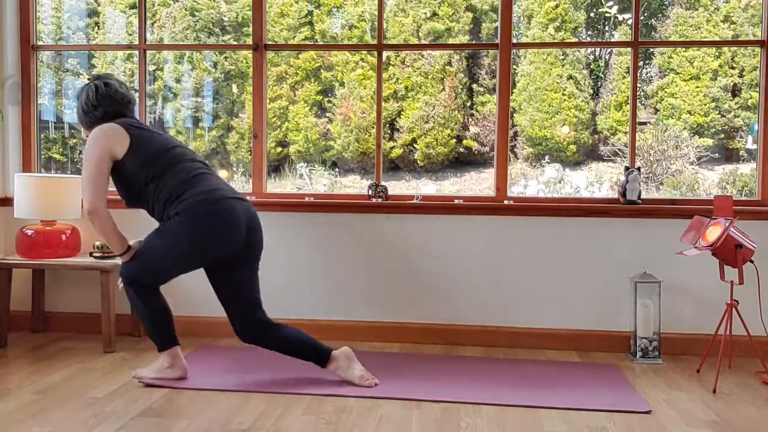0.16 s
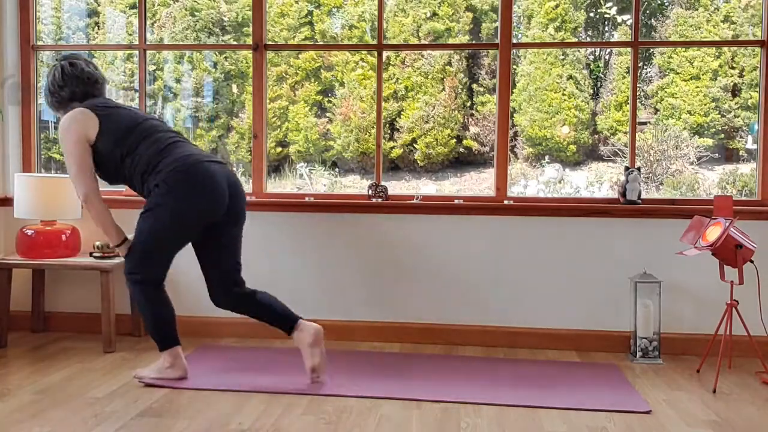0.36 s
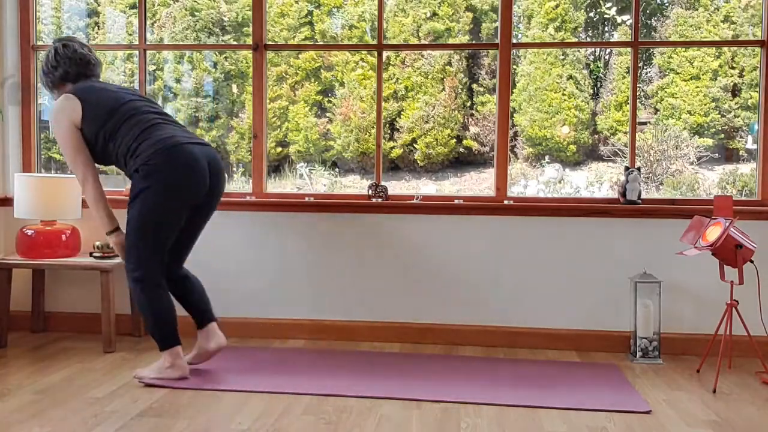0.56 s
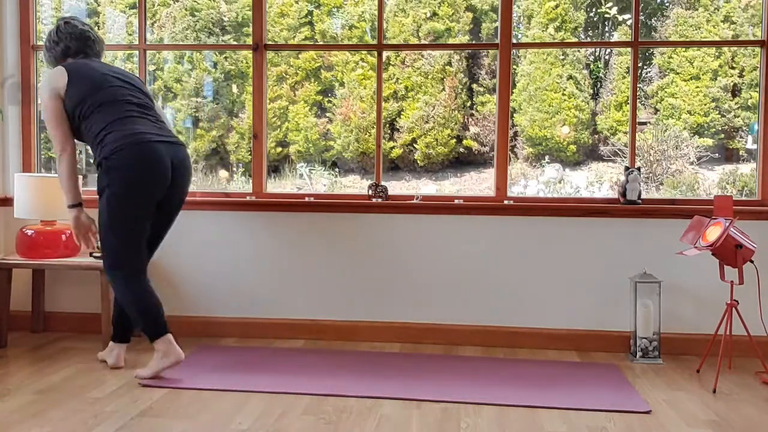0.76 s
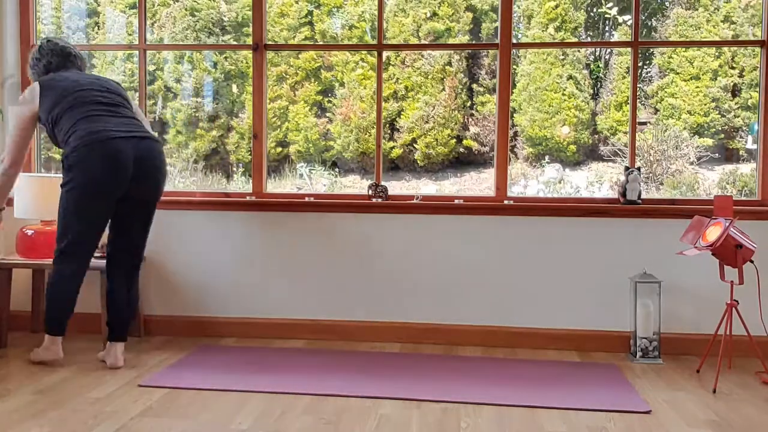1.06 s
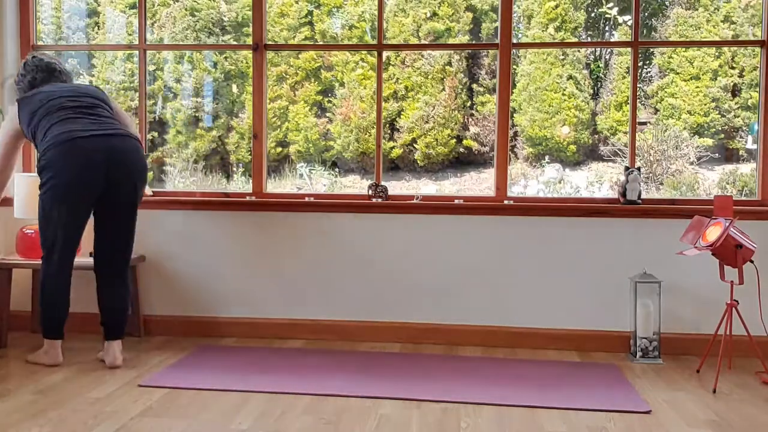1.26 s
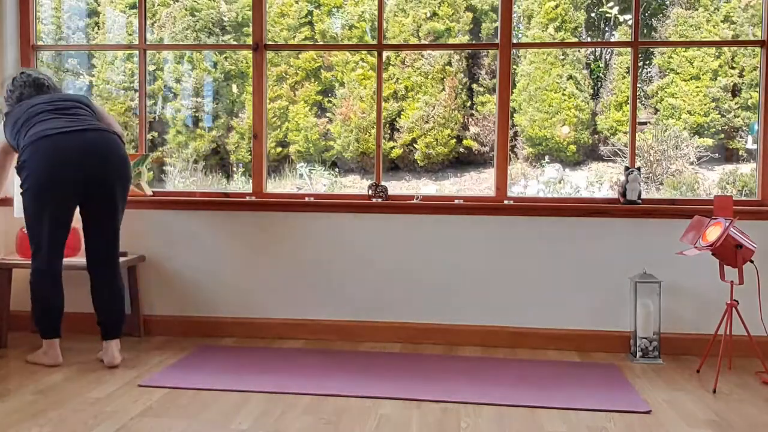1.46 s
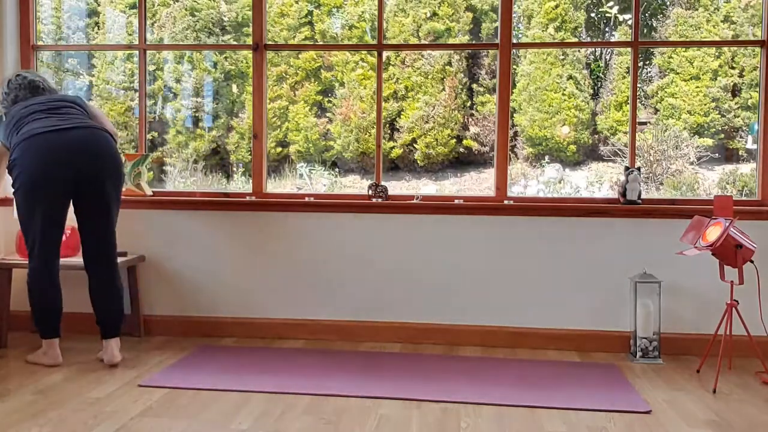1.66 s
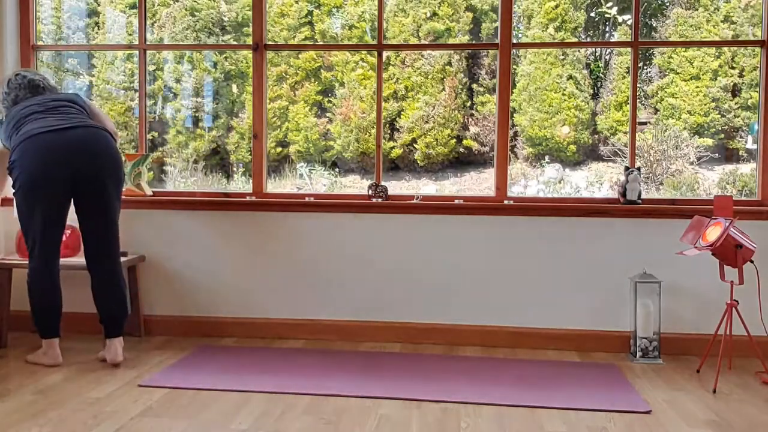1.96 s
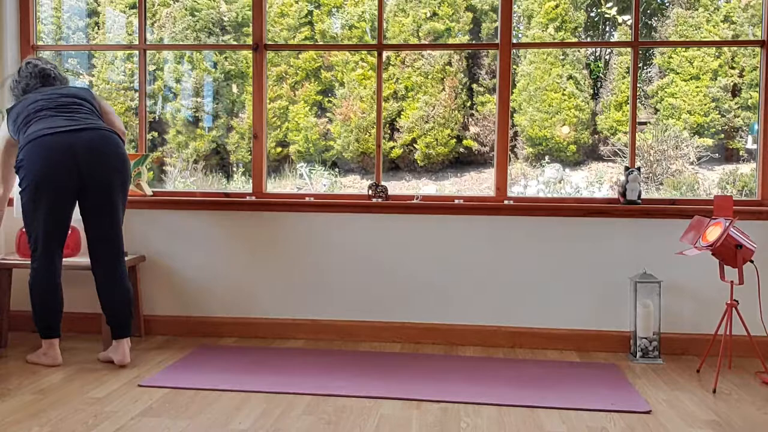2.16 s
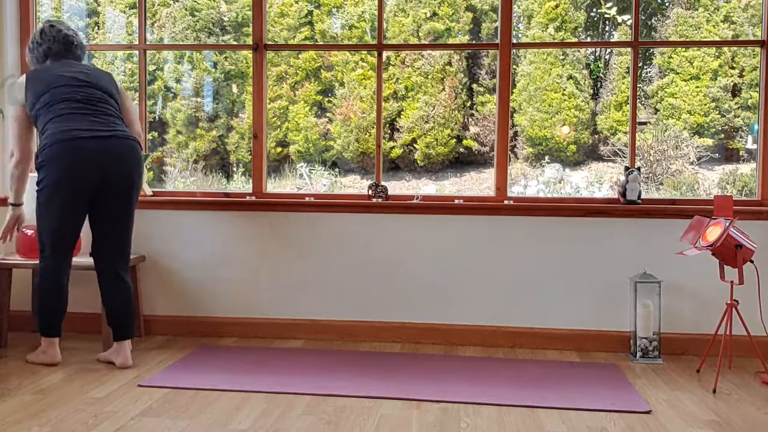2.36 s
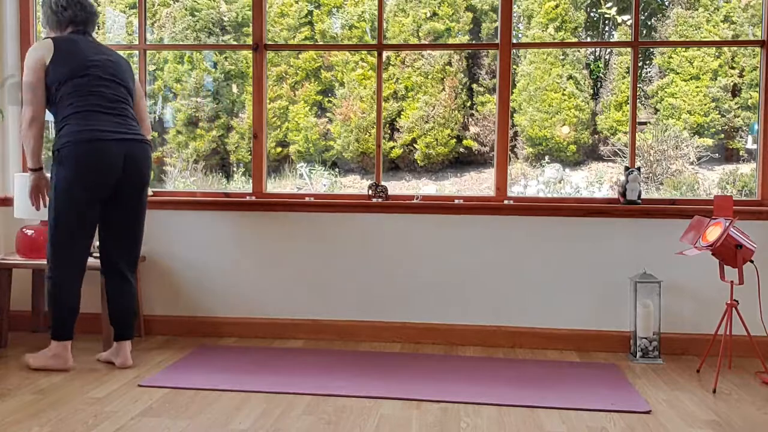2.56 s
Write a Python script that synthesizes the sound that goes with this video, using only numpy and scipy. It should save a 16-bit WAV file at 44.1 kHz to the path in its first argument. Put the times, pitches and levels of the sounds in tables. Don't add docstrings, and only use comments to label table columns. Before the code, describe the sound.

Bare feet peel off a rubber mat and scuff across a wooden floor with sharp cracks

```python
import sys
import numpy as np
from scipy import signal
from scipy.fft import rfft, irfft
from scipy.io import wavfile
from scipy.ndimage import uniform_filter1d, minimum_filter1d

SR = 44100
rng = np.random.default_rng(int(sys.argv[2]) if len(sys.argv) > 2 else 0)


def dump(signal):
    limited = np.clip(np.atleast_2d(signal).T, -1, 1)
    pcm = np.round(limited * 32767).astype(np.int16)
    wavfile.write(sys.argv[1], SR, pcm)


def voltage_ratio(level):
    return 10 ** (np.asarray(level, float) / 20)


N = 119070
t = np.arange(N) / SR

# frequency in Hz, level in dB.
HUM_COLOUR = [(18, -52), (30, -17), (81, -14.5), (147, -3), (197, 1.5), (271, 1.5), (368, -16.5),
              (500, -7.5), (650, -29.5), (1100, -120)]
HUM_DB, HUM_FADE_S, HUM_FADE_DB_PER_S = -70, 2.37, 26

# start in seconds, level in dB, frequency in Hz, T60 in seconds.
THUMPS = [(0, -63.5, 234, 1), (.1, -74.5, 520, .1), (.205, -53.5, 225, 0.7), (.33, -54, 239, 0.2),
          (0.704, -46, 570, 0.16), (0.711, -51, 198, 0.59), (.86, -60, 230, 1), (1.14, -68.5, 141, 0.83),
          (1.36, -58, 185, 0.31), (1.901, -57, 167, 0.47), (2.199, -59.5, 162, 0.5), (2.3, -73, 70, .4),
          (2.34, -77, 190, 0.22)]
THUMP_RISE_S, THUMP_WIDTH = 0.0038, 0.54

# time in seconds, level in dB.
CLOTH_LEVEL = [(0, -49.5), (.065, -48), (.14, -42.5), (.43, -46.5), (.59, -45), (.71, -39.5), (1.02, -45),
               (1.19, -46), (1.29, -52.5), (1.53, -49), (1.67, -56), (1.87, -57), (2.06, -56), (2.13, -51),
               (2.19, -55), (2.52, -49), (2.7, -63)]
# frequency in Hz, level in dB.
FABRIC_COLOUR = [(240, -46.5), (400, -15.5), (819, -15.5), (1100, -7.5), (1490, -9.5), (1640, -11.5),
                 (2800, -5.5), (4660, -10), (7300, -6.5), (9490, -27.5), (16100, -120)]
FIBRE_GRAIN_DB, PATCH_DB, SWAY_DB = 1.4, 1.2, 0.8
CLOTH_BANDS_HZ = 250 * 2 ** (np.arange(11) / 2)

# centre in seconds, level in dB, frequency in Hz,
# half-length in seconds.
SQUEAKS = [(.108, -50, 3200, .016), (.095, -55, 2660, .03), (.711, -30, 2640, .005), (.72, -45, 2640, .06),
           (.745, -47, 3340, .025), (.712, -48, 4160, .012), (1.149, -58, 3010, .02),
           (1.76, -64, 4910, .035), (1.925, -65, 4810, .03), (2.15, -64, 2960, .035),
           (2.19, -57, 2700, .012), (1.89, -66, 7160, .12), (1.49, -58, 7010, .045),
           (1.445, -64, 4910, .03)]
SQUEAK_WAVER_HZ, SQUEAK_FLUTTER_DB, SQUEAK_GAIN_DB = 42, 3, 7

# start in seconds, peak in dB,
# frequency in Hz, T60 in seconds.
RINGS = [(.2145, -39.5, 636, .16), (0.2133, -26, 1410, 0.038), (.2145, -21, 2160, 0.088),
         (.2145, -25.5, 1864, 0.085), (.233, -21, 2116, 0.045), (0.5038, -24.5, 1450, .05),
         (0.5048, -30.5, 1135, 0.068), (.5043, -38, 1950, 0.12), (0.5025, -32.5, 2770, 0.051),
         (0.5251, -29, 2710, 0.023), (0.53, -36, 1410, 0.068), (1.1486, -27, 3190, 0.013),
         (2.088, -46, 2960, .1), (2.1, -39, 2965, 0.11), (2.1, -41, 2500, 0.024),
         (.2302, -7, 3600, .04), (.2348, -7, 3250, .03), (.2315, -10, 3900, .05),
               (1.1245, -44, 3030, .05), (1.127, -40, 3700, .04), (1.1505, -35, 3010, .035),
               (1.172, -47, 3000, .04), (2.135, -51, 2960, .1), (2.165, -49, 2970, .1),
               (2.184, -50, 2660, .08), (.512, -36, 1990, .05), (.56, -42, 1330, .08),
               (.8164, -20, 1200, .005), (2.1002, -38, 2150, .012)]
RING_RISE_S, RING_FLUTTER_DB = 0.00052, 2.5

# level in dB, rise in dB per second, hold in seconds.
SCUFFS = [
    (-21.5, 2894, 0.024),
    (-22, 275, 0.072),
    (-22.5, 1442, 0.012),
    (-17.5, 333, 0.031),
    (-50, 226, 0.034),
    (-49.5, 1447, 0.031),
    (-35.5, 897, 0.085),
    (-31.5, 521.5, 0.0087),
]
SCUFF_PEAKS_S = [.226, .8, 2.251, 2.304, 1.345, 1.471, .168, 2.234]
# frequency in Hz, level in dB.
MAT_COLOUR = [(240, -59), (400, -30), (906, -35), (1210, -19), (2000, -13.5), (3230, -4), (6630, -25.5),
              (7400, -43.5), (9620, -48.5), (16300, -120)]
# frequency in Hz, level in dB.
BOARD_COLOUR = [(240, -55), (400, -30.5), (987, -6.5), (2030, -5), (2160, -8.5), (2890, 0.5), (3510, 0.5),
                (7400, -12.5), (9620, -25), (16300, -120)]
# frequency in Hz, level in dB.
TABLE_COLOUR = [(240, -71), (400, -42), (1140, -19), (1770, -22.5), (2890, -6.5), (4170, -10.5),
                (7400, -9.5), (9620, -33.5), (16300, -120)]
# frequency in Hz, level in dB.
HAND_COLOUR = [(240, -80), (400, -41.5), (1320, -23), (2530, -12), (2860, -6), (5520, -9), (6960, 0.5),
               (7400, -4), (9620, -9), (16300, -120)]
SCUFF_COLOURS = (MAT_COLOUR, BOARD_COLOUR, TABLE_COLOUR, HAND_COLOUR,
                 BOARD_COLOUR, HAND_COLOUR, MAT_COLOUR, TABLE_COLOUR)
SCUFF_RELEASE_S, SCUFF_GRAIN_DB, SCUFF_WET_DB = 0.021, 1.6, -2

# start in seconds, peak in dB, centre in Hz,
# T60 in seconds.
SLIPS = [(.4915, -35, 1410, 0.013), (.4985, -38, 1300, 0.023), (.502, -32, 2000, 0.011),
         (.7304, -26.5, 2680, 0.023), (.7673, -23.5, 3260, 0.022), (.7967, -13.5, 2870, .02),
         (.8017, -20, 3020, 0.048), (.8371, -20, 2900, .02), (.849, -13, 3530, 0.022),
         (.908, -14, 3160, 0.022), (2.2545, -13, 5000, .02), (2.3043, -9, 7100, .02),
         (2.309, -5.5, 6550, .01), (2.312, -7, 6370, .02), (2.3145, -5.5, 6610, .008),
         (2.3185, -9, 6780, 0.014), (2.3215, -9.5, 7300, 0.0087), (2.3305, -12, 7050, .015),
         (2.3375, -12.5, 6780, .01), (2.348, -12, 6490, .008), (2.3515, -13, 6860, 0.016),
         (2.368, -12.5, 6720, .01)]
# start in seconds, peak in dB, centre in Hz, T60 in seconds.
CLICKS = [(.5042, -16.5, 2630, 0.035), (.5255, -24.5, 2460, 0.0075), (1.082, -31, 3000, .02),
          (1.1243, -30, 3000, 0.0089), (1.1484, -24, 3400, 0.007), (1.468, -33, 4170, 0.05),
          (1.95, -35, 3000, 0.0063), (2.0996, -35.5, 2590, 0.03), (2.2773, 1.5, 3980, 0.02),
          (.2144, -5.5, 4320, 0.019), (.7085, -42, 1500, 0.017)]
# start in seconds, peak in dB, centre in Hz, T60 in seconds.
CRACKS = [(.107, -45, 601, 0.024), (0.2138, -3, 3256, 0.073), (.2145, -8, 5470, 0.029),
          (.215, -19.5, 1410, 0.085), (0.2167, -44.5, 605, 0.05), (.229, -7, 6240, 0.033),
          (.2295, -4.5, 3610, 0.044), (0.2348, -21, 3094, 0.017), (.467, -34, 1490, 0.063),
          (.5045, -29.5, 1393, 0.077), (.531, -39.5, 1290, 0.028), (0.8162, 0, 3290, 0.0052),
          (2.2489, -17, 2730, 0.14), (2.2495, -16, 4880, 0.042), (2.2745, -1.5, 6890, 0.029),
          (2.2765, -4.5, 6350, 0.02), (2.2765, -4.5, 2740, 0.021), (2.281, 0, 7030, 0.01),
          (2.285, -12, 6830, 0.0055)]
SLIP_WIDTH, CLICK_WIDTH, CRACK_WIDTH = 0.3, 1.16, 0.35
CRACK_WET_DB = -8

ROOM_T60_S, ROOM_BUILD_S = 0.43, 0.015

# start in seconds, end in seconds, gain in dB.
DROPS = [(.8098, .813, -27), (.813, .8158, -16), (.8176, .8188, -5), (2.2797, 2.2808, -8),
         (2.2825, 2.284, -6), (.2375, .2395, -5), (1.7232, 1.7256, -30), (1.7305, 1.7385, -40),
         (2.272, 2.274, -12), (.207, .2135, -3), (.222, .2285, -5)]
# start in seconds, end in seconds.
STARVED = [(.18, .213), (.256, .29), (.337, .385), (.425, .47), (.76, .822), (.833, .863), (.912, .955),
           (.99, 1.015), (1.03, 1.065), (.214, .228), (.872, .878), (.886, .891), (.62, .64)]
STARVED_DB, STARVING_ENDS_S = -18, 1.2
TOP_GAP_DB, TOP_BLOCK_S, TOP_OPEN, TOP_OPEN_LATE = -10, 0.016, 0.8, 0.95
# time in seconds, level in dB.
TICKS = [
    (.2198, -45),
    (2.2725, -38),
    (2.278, -26),
]
# frequency in Hz, level in dB.
TICK_COLOUR = [(6000, -30), (8300, 9), (9300, 13), (11000, 1), (15400, -1.5), (15600, -40.5)]
# frequency in Hz, level in dB.
BODY_FILTER = [(20, 0), (7220, 0), (7280, -80)]
TOP_FILTER = [(7220, -4), (7900, -19), (8220, -28), (8370, -75)]
HISS_COLOUR = [(6000, -34), (8300, -8), (9600, 0.5), (11000, 4.0), (15400, 1.5), (15600, -43.5)]
HISS_DB, CEILING = -90, 0.96


def noise():
    return rng.standard_normal(N)


def level(x, db):
    return x * voltage_ratio(db) / np.sqrt(np.mean(x ** 2))


def colour(x, table):
    hz, db = np.array(table).T
    f = np.arange(N // 2 + 1) * SR / N + 1
    return irfft(rfft(x) * voltage_ratio(np.interp(np.log(f), np.log(hz), db)), N)


def band(x, hz, width_hz):
    return signal.lfilter(*signal.iirpeak(hz, hz / width_hz, SR), x)


def walk(rate_hz):
    k = max(int(SR / rate_hz), 2)
    held = noise()[np.arange(N) // k]
    slewed = uniform_filter1d(uniform_filter1d(held, k), k)
    return slewed / slewed.std()


def room(x):
    tail = noise() * (1 - np.exp(-t / ROOM_BUILD_S)) * voltage_ratio(-60 * t / ROOM_T60_S)
    return signal.fftconvolve(x, tail / np.sqrt(np.sum(tail ** 2)))[:N]


def hum():
    fade_db = -HUM_FADE_DB_PER_S * np.maximum(t - HUM_FADE_S, 0)
    return level(colour(noise(), HUM_COLOUR), HUM_DB) * voltage_ratio(0.85 * walk(11.0) + fade_db)


def thumps():
    out = np.zeros(N)
    for s, db, hz, t60 in THUMPS:
        u = np.maximum(t - s, 0)
        width_hz = THUMP_WIDTH * hz
        rumble = level(band(band(noise(), hz, width_hz), hz, width_hz), db)
        out += (1 - np.exp(-u / THUMP_RISE_S)) * voltage_ratio(-60 * u / t60) * rumble
    return out


def cloth():
    raw = rfft(colour(noise() * voltage_ratio(FIBRE_GRAIN_DB * walk(300)), FABRIC_COLOUR))
    sway_db = SWAY_DB * walk(12.21)
    f = np.arange(N // 2 + 1) * SR / N + 1
    rustle = np.zeros(N)
    for hz in CLOTH_BANDS_HZ:
        window = np.cos(np.pi / 2 * np.clip(2 * np.log2(f / hz), -1, 1)) ** 2
        rustle += irfft(raw * window, N) * voltage_ratio(sway_db + PATCH_DB * walk(28))
    rustle = level(colour(rustle, [(7000, -2), (8200, 7.0)]), 0)
    return rustle * voltage_ratio(np.interp(t, *np.array(CLOTH_LEVEL).T))


def squeaks():
    out = np.zeros(N)
    for s, db, hz, half_s in SQUEAKS:
        tone = np.sin(2 * np.pi * np.cumsum(hz + SQUEAK_WAVER_HZ * walk(150)) / SR)
        gain = voltage_ratio(db + SQUEAK_GAIN_DB + SQUEAK_FLUTTER_DB * walk(120))
        out += np.exp(-np.abs(t - s) / half_s) * gain * tone
    return out


def rings():
    modes = np.zeros(N)
    for s, db, hz, t60 in RINGS:
        u = np.maximum(t - s, 0)
        envelope = voltage_ratio(db - 60 * u / t60) * np.minimum(u / RING_RISE_S, 1)
        modes += envelope * np.sin(2 * np.pi * hz * u)
    return modes * voltage_ratio(RING_FLUTTER_DB * walk(250))


def scuffs():
    out = np.zeros(N)
    for s, (db, rise, hold), look in zip(SCUFF_PEAKS_S, SCUFFS, SCUFF_COLOURS):
        swell = voltage_ratio(np.minimum(rise * (t - s), 0))
        release = np.exp(-np.maximum(t - s - hold, 0) / SCUFF_RELEASE_S)
        grain = noise() * voltage_ratio(SCUFF_GRAIN_DB * walk(400))
        out += swell * release * level(colour(grain, look), db)
    return out


def cracks(rows, width, snap):
    out = np.zeros(N)
    u = t[:4000]
    for s, db, hz, t60 in rows:
        i = int(s * SR)
        burst = rng.standard_normal(4000) * voltage_ratio(-60 * u / t60) * np.minimum(u / 0.00047, 1)
        burst[12] += snap
        for wide in (1, 1.5, 1.5):
            burst = band(burst, hz, wide * width * hz)
        out[i:i + 4000] += voltage_ratio(db) * burst / np.abs(burst).max()
    return out


def scene():
    snaps = cracks(CRACKS, CRACK_WIDTH, 2.5) + cracks(CLICKS, CLICK_WIDTH, 3.5)
    rub = scuffs()
    wet = room(voltage_ratio(CRACK_WET_DB) * snaps + voltage_ratio(SCUFF_WET_DB) * rub)
    background = hum() + squeaks() + thumps() + cloth()
    slips = cracks(SLIPS, SLIP_WIDTH, 2.1)
    return (snaps + rub + wet + background + slips + rings())[None]


def limit(x):
    peak = -minimum_filter1d(-np.abs(x), size=61)
    return x * np.minimum(1, CEILING / np.maximum(uniform_filter1d(peak, size=31), 1e-9))


def starve(top):
    open_share = np.where(t < STARVING_ENDS_S, TOP_OPEN, TOP_OPEN_LATE)
    shut = rng.random(N)[(t / TOP_BLOCK_S).astype(int)] > open_share
    starved = sum((t > a) & (t < b) for a, b in STARVED)
    return top * uniform_filter1d(voltage_ratio(TOP_GAP_DB * shut + STARVED_DB * starved), size=100)


def splice_ticks():
    splice = np.zeros(N)
    for s, db in TICKS:
        splice[int(s * SR)] += voltage_ratio(db)
    return colour(splice, TICK_COLOUR)


def top_cut(x):
    return signal.sosfilt(signal.butter(12, 15500, fs=SR, output="sos"), x)


def record(dry):
    drop_db = sum(db * ((t > a) & (t < b)) for a, b, db in DROPS)
    x = dry * uniform_filter1d(voltage_ratio(drop_db), size=24)
    x = signal.sosfilt(signal.butter(2, 90, "high", fs=SR, output="sos"), x)
    x = limit(x)[0]
    body = colour(x, BODY_FILTER)
    top = starve(colour(x - body, TOP_FILTER))
    hiss = colour(level(noise(), HISS_DB), HISS_COLOUR)
    mix = body + top + splice_ticks() + hiss
    return top_cut(mix[None])


dry = scene()
out = record(dry)
dump(out)
```